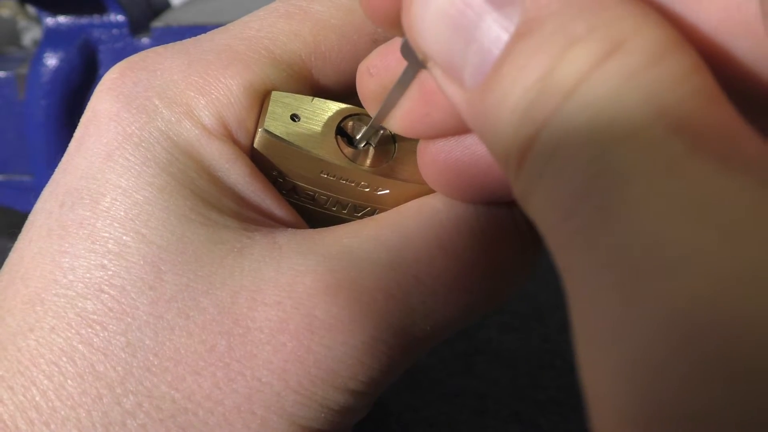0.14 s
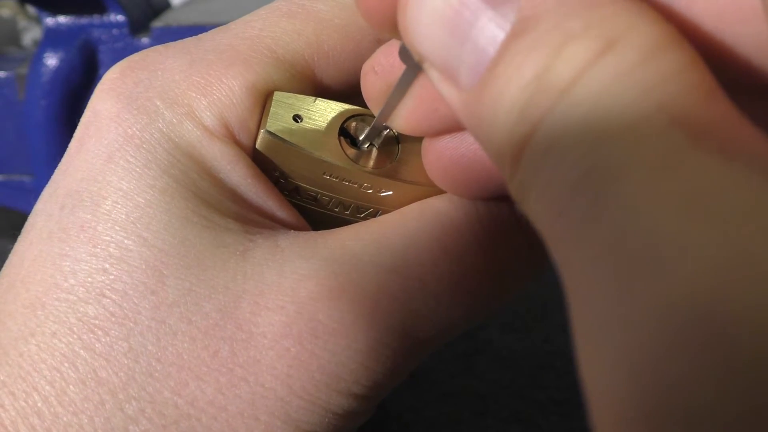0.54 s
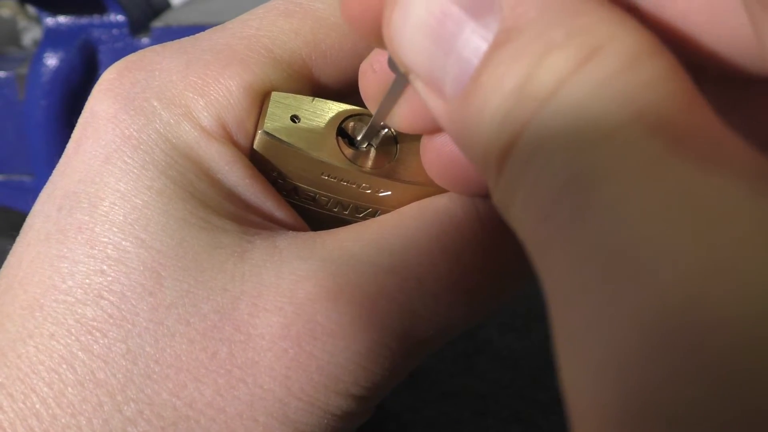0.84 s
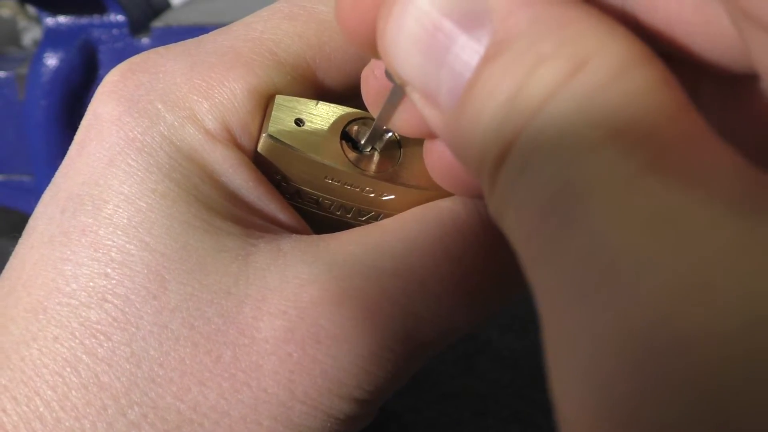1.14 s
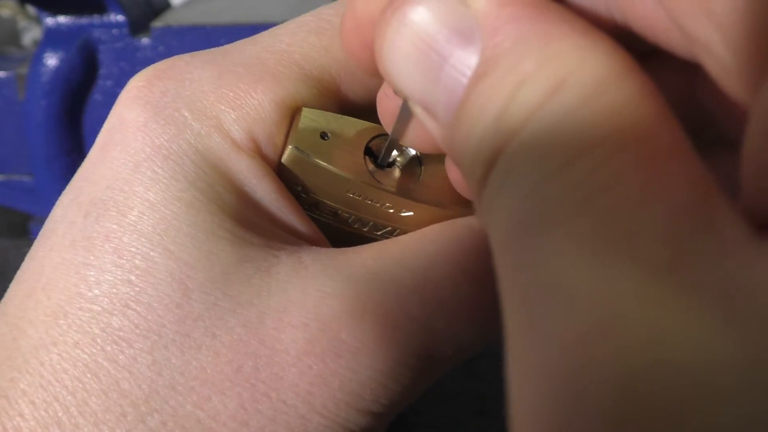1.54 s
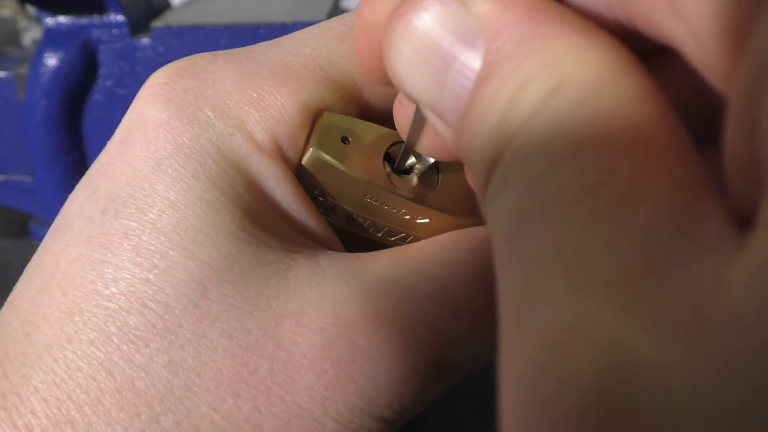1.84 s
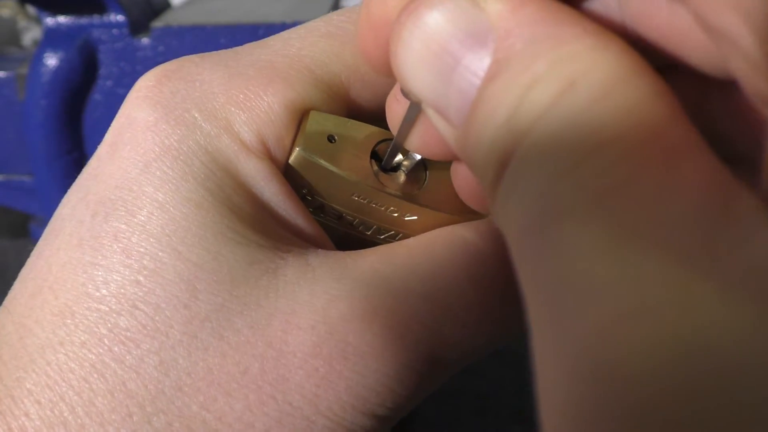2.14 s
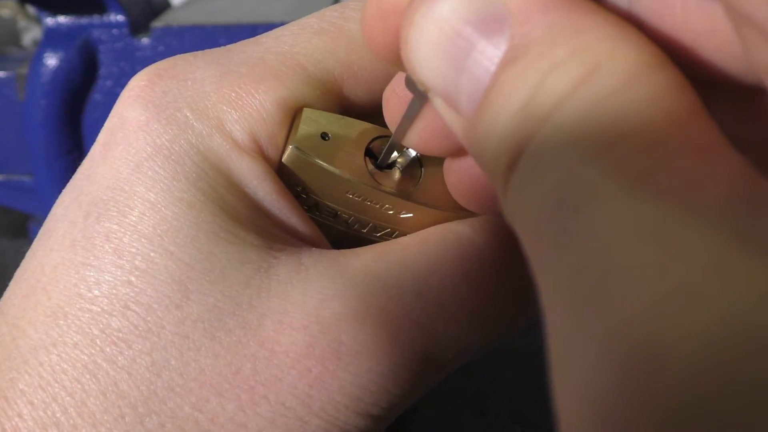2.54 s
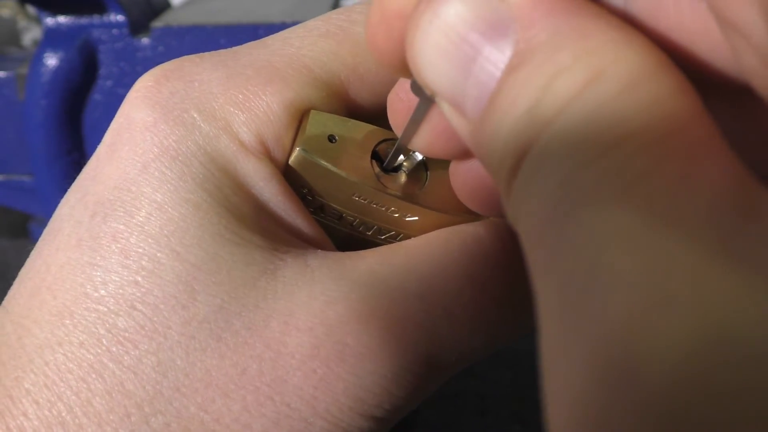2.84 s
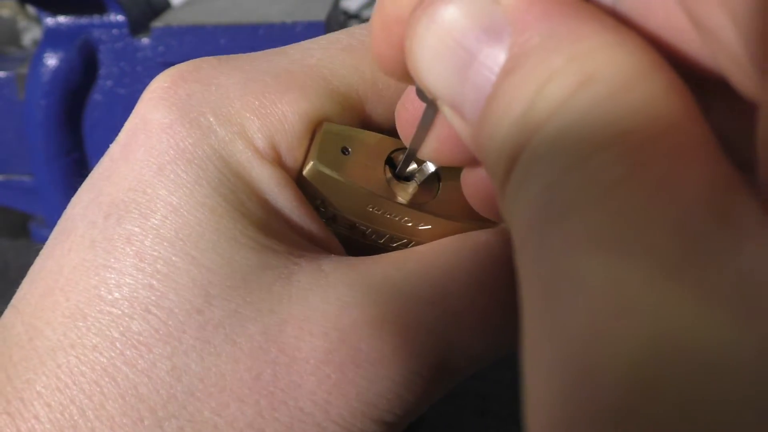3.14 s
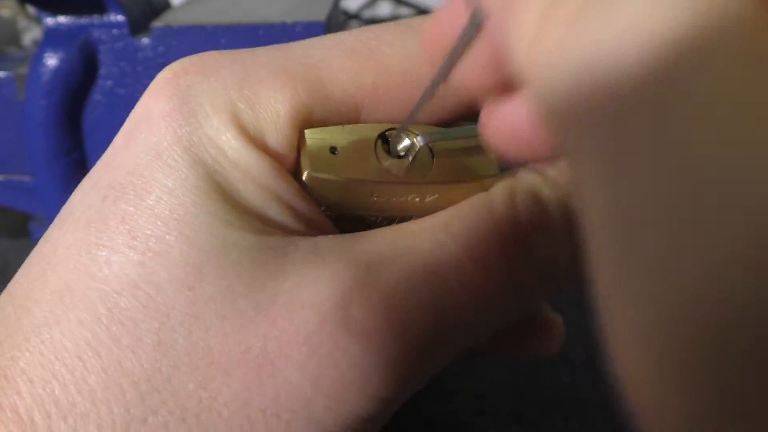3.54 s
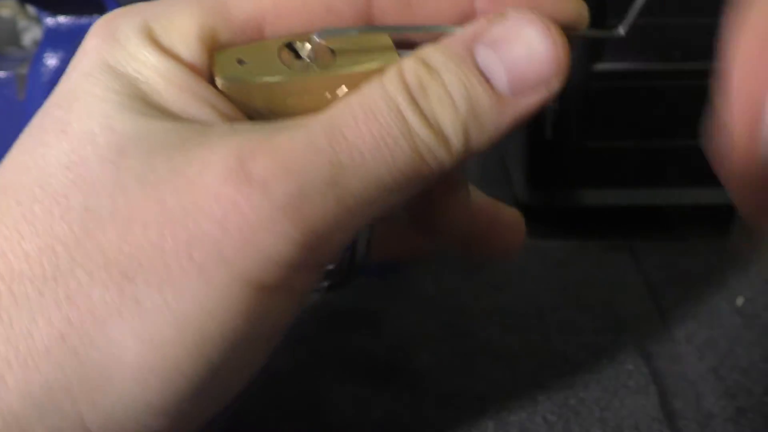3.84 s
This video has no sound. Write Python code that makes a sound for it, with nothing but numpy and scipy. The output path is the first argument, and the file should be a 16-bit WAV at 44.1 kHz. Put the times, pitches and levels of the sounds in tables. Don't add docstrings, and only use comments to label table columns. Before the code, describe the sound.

A steel pick ticks faintly and irregularly inside a small brass padlock, pins snap sharply, then after brief rattles the shackle springs open with a bright, loud click; close microphone, quiet room, soft fan rumble and hiss.

```python
import sys
import numpy as np
from scipy import signal
from scipy.fft import irfft
from scipy.io import wavfile
from scipy.ndimage import uniform_filter1d

SR = 44100
rng = np.random.default_rng(int(sys.argv[2]) if len(sys.argv) > 2 else 0)


def field_ratio(decibels):
    return 10 ** (np.asarray(decibels, dtype=float) / 20)


def wav_record(signal):
    frames = np.transpose(np.atleast_2d(signal))
    bounded = np.clip(frames, -1, 1)
    quanta = np.round(bounded * 32767).astype(np.int16)
    wavfile.write(sys.argv[1], SR, quanta)


N = 176400

# frequency in Hz, density in dB per Hz.
RUMBLE_SPECTRUM = [(20, -8.5), (70, -6.5), (100, -2.5), (150, -5.5), (270, -5.5), (400, -10), (600, -21),
                   (800, -21)]
# frequency in Hz, density in dB per Hz.
HISS_SPECTRUM = [(800, -8.5), (976, -2), (1570, -1), (2030, -6.5), (3020, -9.5), (3400, -12), (5770, -23),
                 (15600, -18)]
# frequency in Hz, left-right coherence from -1 to 1.
COHERENCE = [(60, 0.0084), (290, 0.29), (1410, -0.15), (3100, 0.21), (5600, 0.71), (6300, 0.73),
             (8900, 0.59), (10500, 0.54)]
# frequency in Hz, width in Hz, level in dB.
FAN_HUM = [(100, 16, -71), (212, 14, -67), (270, 13, -72.5)]
MOTOR_HZ = [1225, 1425, 1575, 1675, 1775, 2925, 2975, 3125]
MOTOR_DB = [-82.5, -78, -74.5, -80.5, -82, -87.5, -86.5, -92.5]

# frequency in Hz, decay time T60 in seconds.
ROOM_T60 = [(400, .25), (1500, 0.81), (4000, 0.71), (6200, 0.59), (7600, 0.46), (11000, 0.42),
            (15000, 0.35)]
# frequency in Hz, level in dB.
SNAP_WALL_COLOUR = [(600, -26.5), (1700, -1), (2400, -4), (3000, -5), (4500, -4.5), (6700, -2), (9000, -4),
                    (15000, -7)]
# frequency in Hz, width in Hz, level in dB.
SNAP_WALL_BANDS = [(1780, 146, 3), (2160, 197, -1), (2407, 218, 4), (3920, 120, 3), (4580, 300, -3.5),
                   (5610, 120, -1.5), (6600, 120, 1.5), (6890, 120, 3), (7560, 97, -3)]
# frequency in Hz, level in dB.
RELEASE_WALL_COLOUR = [(600, -31), (2000, -7), (4000, -3), (5400, 2), (8000, -3), (10000, 0), (12500, 5),
                       (15500, -6)]
# frequency in Hz, width in Hz, level in dB.
RELEASE_WALL_BANDS = [(3950, 90, 5), (4210, 150, 0), (4880, 150, 1), (5400, 100, -3), (6010, 110, 10),
                      (6240, 69, 11.5), (6490, 220, 10), (7300, 59.4, 2), (11230, 270, 15.5),
                      (13270, 280, 15)]

# start in seconds, level in dB, direction as a sign, pitch in Hz,
# left-right difference in dB.
HAND_JOLTS = [
    (2.3172, -48.5, 1, 300, 0),
    (2.8432, -49, 1, 480, -2),
    (3.0452, -29, -1, 295, -5),
    (3.5838, -29.5, 1, 386, 3),
    (3.5857, -31, -1, 213, 16.5),
]
# start in seconds, level in dB, pitch of the knock in Hz, treble of the steel in dB,
# left-right difference in dB.
PICK_TICKS = [(.052, -62, 6000, -8, 0), (.061, -53, 6500, -2, 0), (.603, -47, 6000, -9, -5),
              (.617, -56, 9500, 2, 0), (.879, -52.5, 9000, -7, 0), (0.947, -55.5, 9300, -9, 0),
              (1.168, -54.5, 9300, -6, 0), (2.2598, -44.5, 4600, -2, -1), (2.2605, -53, 9500, -5, -5),
              (2.8432, -47.5, 3300, -16.5, 2.5), (2.8443, -53, 4520, -13, 11),
              (2.991, -56.5, 3000, -12.5, -2), (3.0431, -39, 5000, 4, 0), (3.36, -54, 3800, -16.5, -0.5),
              (3.4092, -61, 8000, -5, 0), (3.412, -45.5, 8000, 2.5, 2.5)]
# start in seconds, level in dB, pitch of the knock in Hz,
# treble of the steel in dB, left-right difference in dB.
PLUG_RATTLES = [(3.5257, -32, 4320, -22, -0.5), (3.531, -45.5, 3000, -6.5, 0.5),
                (3.534, -48, 6000, -2.5, 0), (3.5432, -44, 8000, 3.5, -2.5), (3.545, -38, 4000, 0.5, -6),
                (3.5511, -26, 3400, -17, -1), (3.5694, -45.5, 4000, -1, 0), (3.5707, -39.5, 6000, 1.5, -1)]
# start in seconds, level in dB, pitch of the knock in Hz,
# treble of the steel in dB, left-right difference in dB.
SHACKLE_SHAKES = [(3.4378, -53, 3500, -0.5, 0), (3.4392, -40, 4870, -5, 2), (3.4398, -43.5, 2500, -3, .6),
                  (3.4412, -36, 3220, 4.5, 4), (3.4418, -38.5, 5000, 1.5, 2),
                  (3.4437, -39, 2500, -15, -2.5), (3.4449, -38, 4900, -12.5, -2),
                  (3.4475, -53, 8500, -2, -0.5), (3.45, -55.5, 8000, 3, 1)]
# frequency in Hz, level in dB, T60 in seconds.
STEEL_MODES = [(9400, -7.5, .004), (11400, -11.5, 0.0044), (13500, -3, .005), (14900, 0.5, .003)]
# frequency in Hz, level in dB, T60 in seconds.
LOOSE_MODES = [(9400, -8.5, .004), (11400, -13.5, 0.0037), (12340, -11, .006), (13350, -1.5, 0.0073),
               (15400, -13, .003)]

# start in seconds, brass level in dB, pins level in dB.
SNAP_BLOWS = [(3.0448, -12, -11), (3.0449, -1.5, 0), (3.0453, -6, -3), (3.046, -6, -9), (3.0463, -4.5, 1),
              (3.0471, -6, -14), (3.0496, -25, -29), (3.0507, -24, -26), (3.0525, -20, -22)]
# frequency in Hz, level in dB, T60 in seconds.
BRASS_MODES = [(1835, -6.5, 0.0091), (2350, -6, 0.018), (3400, -12, 0.0053), (3880, -5, 0.0063),
               (4540, -3.5, 0.0053), (5000, -6, .006), (5660, -7.5, .006), (6660, 0, 0.0047),
               (7170, -11, .005)]
# frequency in Hz, level in dB, T60 in seconds.
PIN_MODES = [(8160, -6.5, .004), (10070, -7, 0.0044), (10600, -11, .004), (12680, -7, .004),
             (13700, -3, 0.0044), (14890, -1, .005), (15620, -7, .004)]

# start in seconds, knock level in dB, ring level in dB.
RELEASE_BLOWS = [
    (3.5823, -24, -32),
    (3.5837, 1, -11.5),
    (3.5842, -4, -3.5),
    (3.5851, -7, -9.5),
    (3.5858, -12.5, 0),
    (3.5863, -19, -10),
    (3.592, -30.5, -18),
]
# frequency in Hz, level in dB, T60 in seconds.
BODY_MODES = [(1240, -24.5, 0.0094), (1924, -6, 0.005), (2300, -6.5, 0.0074), (3004, -4.5, 0.0076),
              (3925, -3, 0.0058), (4930, -2.5, 0.0048), (7210, -19, .006), (8740, -15.5, 0.0062),
              (9840, -5, 0.0045)]
# frequency in Hz, level in dB, T60 in seconds.
SHACKLE_MODES = [(10510, -15, 0.0084), (10960, -15.5, .01), (11490, -3.5, 0.018), (12420, -7, .011),
                 (12715, -10.5, 0.00995), (13360, 1, .013), (13800, -13, .009), (14400, -14.5, .009),
                 (15600, -17, 0.0087)]

EDGE_HZ, CLICK_EDGE_HZ, TOP_SHELF_DB = 15760, 16600, -19
CRACK_T60 = 0.0044


def evened(x):
    return x / np.sqrt(np.mean(x ** 2) + 1e-20)


def read(points, hz):
    f, value = np.transpose(points)
    return np.interp(np.log(hz + 1), np.log(f + 1), value)


def add(mix, s, sound):
    part = mix[..., round(s * SR):][..., :sound.shape[-1]]
    part += sound[..., :part.shape[-1]]


def pan(x, db):
    return x * field_ratio(np.array([[db / 2], [-db / 2]]))


def lowpass(x, hz):
    taps = signal.firwin(401, hz, window=("kaiser", 9), fs=SR)
    return signal.oaconvolve(x, taps[None], "same")


def ring(modes, size, rise_s=0.00016, spread=1):
    t = np.arange(size) / SR
    phases = spread * rng.uniform(0, 2 * np.pi, len(modes))
    total = np.zeros(size)
    for (hz, db, t60), phase in zip(modes, phases):
        total += field_ratio(db - 60 * t / t60) * np.sin(2 * np.pi * hz * t + phase)
    return total * np.minimum(t / rise_s, 1)


def crack(t60, size):
    return np.diff(rng.standard_normal(size + 1)) * field_ratio(-60 * np.arange(size) / SR / t60)


def air():
    rumble_db, hiss_db = -57.5, -62.5
    patch_db, swell_db = 0.88, 0.5
    frames, hz = N // 1024 + 5, np.fft.rfftfreq(4096, 1 / SR)
    a, b, c, d, patches = rng.standard_normal((frames, 2049, 5)).T
    patches = uniform_filter1d(patches, size=40, axis=0)
    patches = evened(uniform_filter1d(patches, size=4, axis=1))
    swell = evened(uniform_filter1d(rng.standard_normal(frames), size=10))

    low = field_ratio(read(RUMBLE_SPECTRUM, hz)) * (hz < 800) * (hz > 15)
    high = field_ratio(read(HISS_SPECTRUM, hz)) * (hz >= 800) * (hz < EDGE_HZ)
    power = (field_ratio(rumble_db) * evened(low)) ** 2 + (field_ratio(hiss_db) * evened(high)) ** 2
    for f, width, db in FAN_HUM:
        line = evened(1 / (1 + (2 * (hz - f) / width) ** 2))
        power = power + (field_ratio(db) * line) ** 2

    same = np.clip(read(COHERENCE, hz), -1, 1)[:, None]
    left = a + 1j * b
    right = same * left + np.sqrt(1 - same ** 2) * (c + 1j * d)
    z = np.array([left, right]) * np.sqrt(power)[:, None]
    z = z * field_ratio(patch_db * patches + swell_db * swell)
    x = signal.istft(z, nperseg=4096, noverlap=3072)[1][:, 2048:N + 2048]
    return evened(x) * np.sqrt(power.mean())


def whine():
    t = np.arange(N) / SR
    phases = rng.uniform(0, 2 * np.pi, len(MOTOR_HZ))
    tones = np.zeros(N)
    for hz, db, phase in zip(MOTOR_HZ, MOTOR_DB, phases):
        tones += field_ratio(db) * np.sin(2 * np.pi * hz * t + phase)
    return np.array([tones, -tones])


def room(x):
    echo_gap_s, early_db, early_t60 = 0.0044, 10.5, 0.049
    noise = rng.standard_normal((2, 24000))
    hz, t, z = signal.stft(noise, SR, nperseg=256)
    decay = field_ratio(-60 * t / read(ROOM_T60, hz)[:, None])
    tail = signal.istft(z * decay, SR, nperseg=256)[1]
    tail = tail / np.linalg.norm(tail[0])
    t = np.arange(tail.shape[1]) / SR
    early = field_ratio(early_db - 60 * t / early_t60)
    tail = tail * (1 + early) * np.clip(t / echo_gap_s, 0, 1) ** 2
    wet = signal.fftconvolve(x.mean(0)[None], tail, axes=1)[:, :N]
    return lowpass(wet, EDGE_HZ)


def to_walls(s, db, tone, bands):
    hz = np.fft.rfftfreq(N, 1 / SR)
    colour = field_ratio(read(tone, hz))
    for f, width, top_db in bands:
        colour = colour + field_ratio(top_db) / (1 + 2j * (hz - f) / width) ** 2
    delay = np.exp(-2j * np.pi * hz * s)
    return field_ratio(db) * irfft(colour * delay, N)


def thumps():
    cycles = 1.42
    out, t = np.zeros((2, N)), np.arange(1500) / SR
    for s, db, direction, hz, pan_db in HAND_JOLTS:
        swing = np.sin(2 * np.pi * hz * t) * np.minimum(4 * hz * t, 1)
        swing = swing * field_ratio(-60 * hz * t / (2 * cycles))
        swing = np.sign(direction) * field_ratio(db) * swing / abs(swing).max()
        add(out, s, pan(swing, pan_db))
    return out


def ticks():
    knock_t60, fizz_t60, fizz_level = 0.0039, 0.004, 0.81
    out = np.zeros((2, N))
    for rows, metal in [(PICK_TICKS + PLUG_RATTLES, STEEL_MODES), (SHACKLE_SHAKES, LOOSE_MODES)]:
        for s, db, hz, treble_db, pan_db in rows:
            partials = [(hz, 0, knock_t60), (hz * 0.68, -4, knock_t60), (hz * 1.39, -5, knock_t60)]
            knock = ring(partials, size=800)
            steel = ring(metal, size=800) + fizz_level * crack(fizz_t60, size=800)
            add(out, s, pan(field_ratio(db) * (knock + field_ratio(treble_db) * steel), pan_db))
    return out


def snap():
    snap_db, crack_db, brass_pan_db, pins_pan_db = -15, -4.5, -0.4, -3.5
    out = np.zeros((2, N))
    for s, brass_db, pins_db in SNAP_BLOWS:
        brass = field_ratio(brass_db) * ring(BRASS_MODES, size=2000)
        pins = ring(PIN_MODES, size=2000) + field_ratio(crack_db) * crack(CRACK_T60, size=2000)
        pins = field_ratio(pins_db) * pins
        add(out, s, field_ratio(snap_db) * (pan(brass, brass_pan_db) + pan(pins, pins_pan_db)))
    return signal.sosfilt(signal.butter(4, 1250, "high", fs=SR, output="sos"), out)


def scrape():
    duration_s, level_db, rise_db, bass_db = 3.5836 - 3.567, -44, 14, -1.5
    u = np.arange(1500) / SR / duration_s
    slips = rng.standard_normal(len(u))
    slips = slips * field_ratio(3.6 * rng.standard_normal(len(u)) + rise_db * u) * (u < 1)
    grain = evened(ring(SHACKLE_MODES, size=130))
    grain = grain + field_ratio(bass_db) * evened(ring(BODY_MODES[1:], size=130))
    return field_ratio(level_db) * evened(np.convolve(slips, grain))


def release():
    knock_level_db, ring_level_db, crack_db = -8.5, -5.5, -5
    knock_pan_db, ring_pan_db = 1.9, -4
    knock, rings = np.zeros(N), np.zeros(N)
    add(knock, 3.567, scrape())
    for s, knock_db, ring_db in RELEASE_BLOWS:
        body = ring(BODY_MODES, size=2000) + field_ratio(crack_db) * crack(CRACK_T60, size=2000)
        add(knock, s, field_ratio(knock_level_db + knock_db) * body)
        shackle = ring(SHACKLE_MODES, size=4000, spread=0.3)
        add(rings, s, field_ratio(ring_level_db + ring_db) * shackle)
    return pan(knock, knock_pan_db) + pan(rings, ring_pan_db)


def scene():
    small = ticks()
    near = small + snap() + release() + thumps()
    sent = to_walls(SNAP_BLOWS[1][0], -10, SNAP_WALL_COLOUR, SNAP_WALL_BANDS)
    sent = sent + to_walls(RELEASE_BLOWS[3][0], -2.5, RELEASE_WALL_COLOUR, RELEASE_WALL_BANDS)
    wet = room(field_ratio(-15.5) * small + sent)
    main_band = lowpass(near, EDGE_HZ)
    top_band = lowpass(near, CLICK_EDGE_HZ) - main_band
    return main_band + field_ratio(TOP_SHELF_DB) * top_band + wet + air() + whine()


def top_cut(x):
    return signal.sosfilt(signal.butter(12, 16800, fs=SR, output="sos"), x)


def record(dry):
    duck, threshold_db, recovery_db_per_s = 0.1, -28, 50.5
    power = uniform_filter1d((dry ** 2).mean(0), size=400)
    power_db = 10 * np.log10(abs(power) + 1e-12)
    fall = np.arange(N) * recovery_db_per_s / SR
    held_db = np.maximum.accumulate(power_db + fall) - fall
    over_db = np.maximum(held_db - threshold_db, 0)
    late_db = np.concatenate([np.zeros(500), over_db[:-500]])
    return top_cut(dry / field_ratio(duck * uniform_filter1d(late_db, size=200)))


dry = scene()
out = record(dry)
wav_record(out)
```